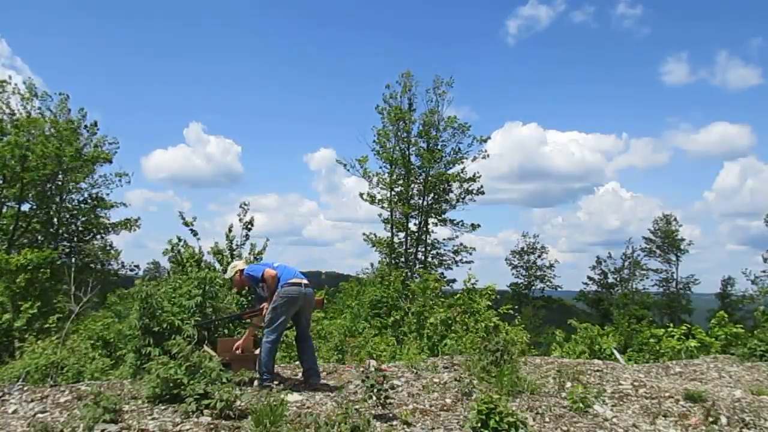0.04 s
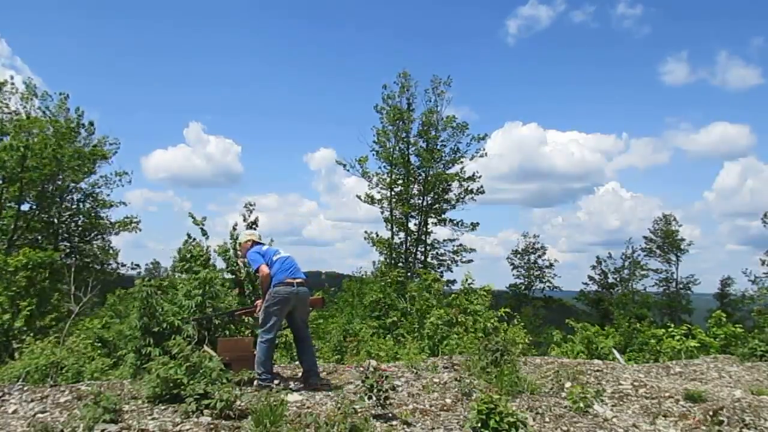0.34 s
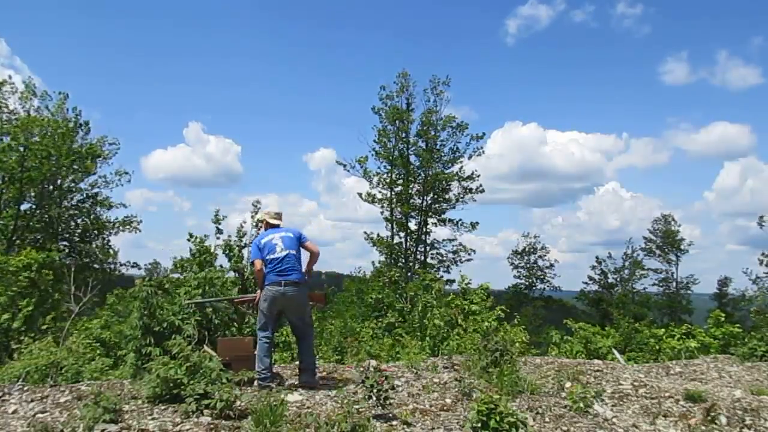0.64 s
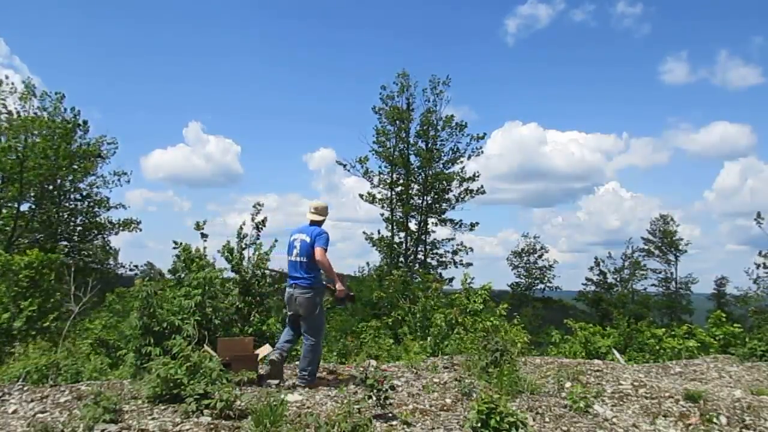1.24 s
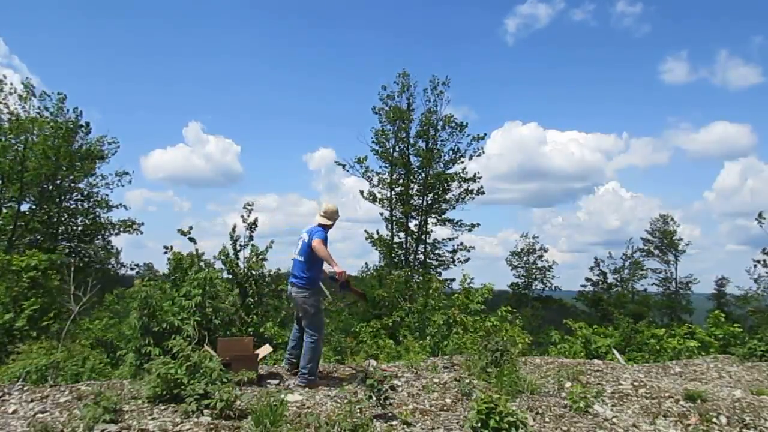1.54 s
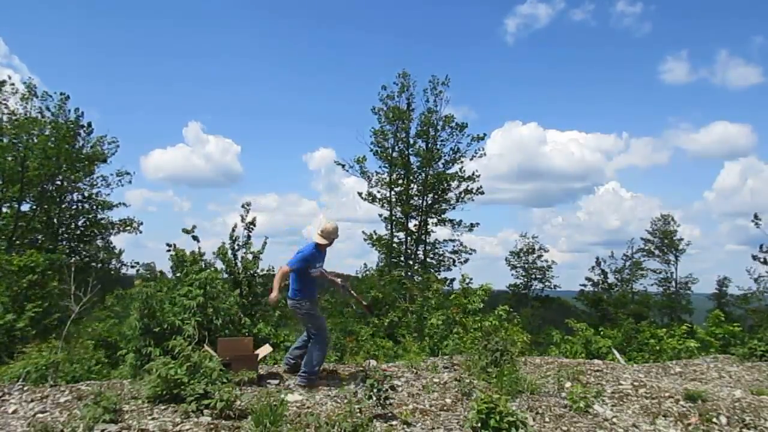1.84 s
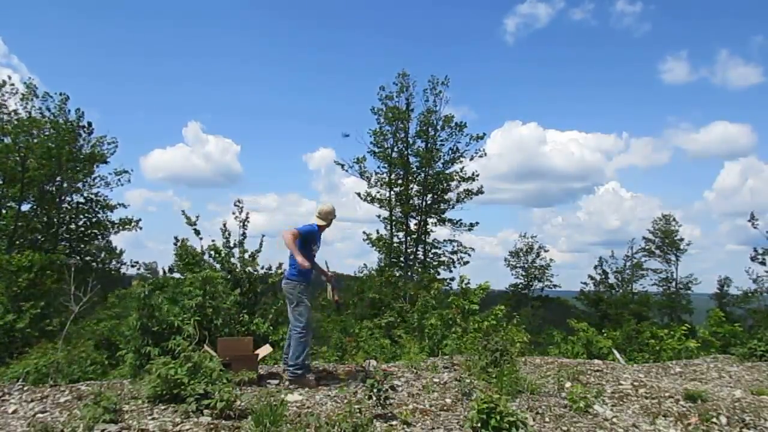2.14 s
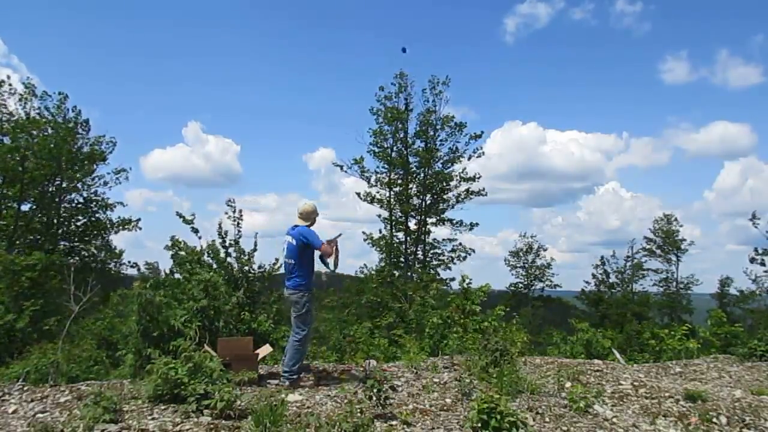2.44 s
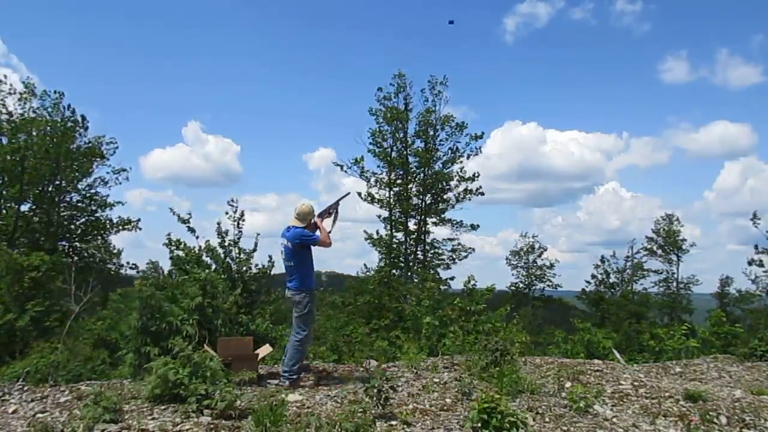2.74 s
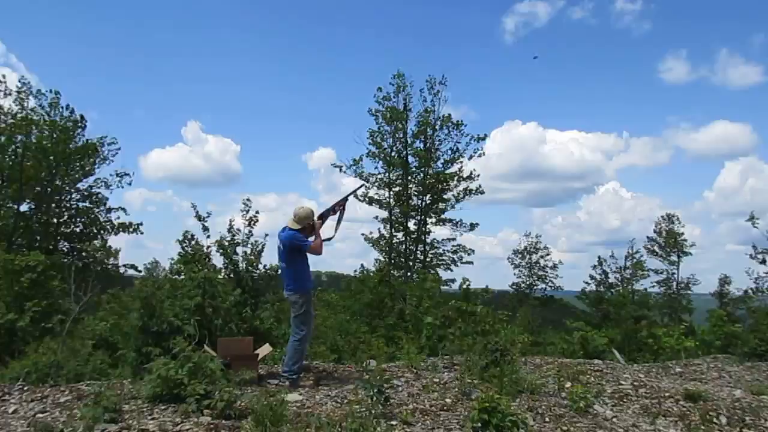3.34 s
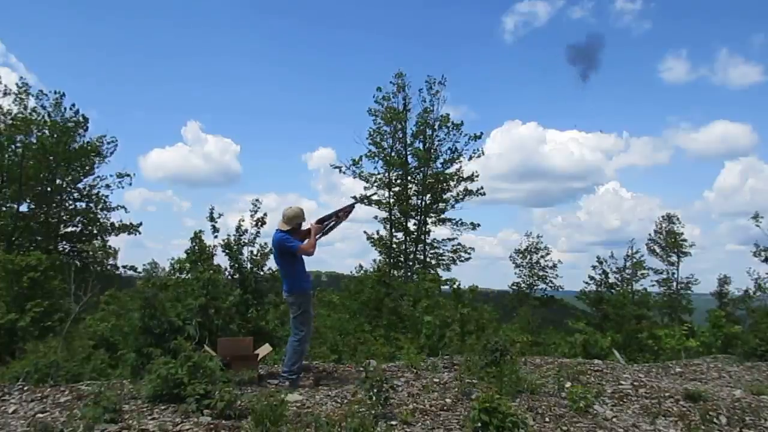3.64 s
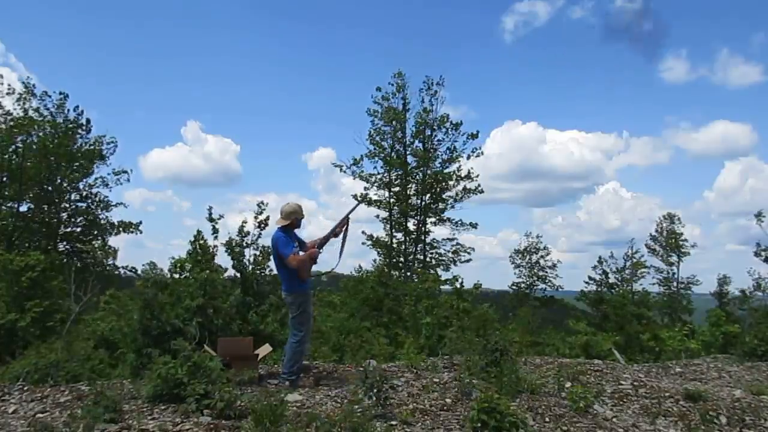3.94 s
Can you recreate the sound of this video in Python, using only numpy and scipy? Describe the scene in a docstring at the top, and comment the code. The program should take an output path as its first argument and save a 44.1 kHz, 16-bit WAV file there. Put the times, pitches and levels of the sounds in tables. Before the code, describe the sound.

A single shotgun blast is the main sound, on an open hilltop. From the start, leaves hiss softly and wind rumbles unevenly on the microphone. A few faint dry ticks fall between 1.2 and 2.5 seconds, and a steel clay thrower clinks lightly at 2 seconds. At about 3.5 seconds the gun fires with a loud, slightly distorted crack, followed by quick echoes and a fading tail from the woods.

```python
"""Leaves hiss on an open hilltop, and eddies of wind rumble on the microphone.
A steel trap clinks in its natural modes as it throws a clay target; then a shotgun fires some metres off.
The shock wave and its ground reflection overload the recorder, whose gain ducks and slowly recovers.
Bushes scatter the blast, trunks and banks return echoes, and the woods reverberate, duller with distance."""
import sys
import numpy as np
from scipy import signal
from scipy.fft import rfft, irfft, next_fast_len
from scipy.io import wavfile
from scipy.ndimage import uniform_filter1d, map_coordinates

SR = 44100
rng = np.random.default_rng(int(sys.argv[2]) if len(sys.argv) > 2 else 0)


def master_out(mix):
    """Clip the mix to full scale and print it as 16-bit PCM to the path in sys.argv[1]."""
    frames = np.transpose(np.atleast_2d(mix))
    ceiling = np.clip(frames, -1, 1)
    pcm = np.round(ceiling * 32767).astype(np.int16)
    wavfile.write(sys.argv[1], SR, pcm)


N = 176400

# Muzzle blast, then its ground reflection. Each row: start in seconds, crack gain in dB,
# 60 dB decay time in seconds, pressure pulse gain in dB.
SHOCKS = [(3.5434, 7, .022, -8), (3.5475, 10.5, 0.036, -2)]
# Echoes from trunks and banks. Each row: start in seconds, peak in dB, centre frequency in Hz.
REFLECTIONS = [(3.5880, 10.5, 2140), (3.5919, 4.5, 1800), (3.594, -14.5, 240), (3.602, -13.5, 260),
               (3.612, -18.5, 188), (3.690, -5, 500), (3.699, -15.5, 480), (3.7127, -15.5, 420),
               (3.7427, -11, 1050), (3.795, -24, 500), (3.839, -16, 650), (3.8471, -15, 920),
               (3.855, -19, 550), (3.8617, -14, 550), (3.876, -24, 480), (3.8925, -21.5, 500),
               (3.962, -25.5, 650), (3.984, -29, 500)]
# Swells from tree lines. Each row: time in seconds, boost in dB, half width in seconds.
TREE_LINE_SWELLS = [(3.664, 3, 0.0044), (3.691, 8.5, 0.0097), (3.744, 6, 0.0059), (3.785, 2.5, 0.0064),
                    (3.852, 9.5, 0.026), (3.861, 6, .006), (3.915, 4.5, 0.02), (3.960, 8, 0.014)]
# Modes of the trap. Each row: frequency in Hz, relative level in dB, 60 dB decay time in seconds.
STEEL_MODES = [(2520, -3, 0.12), (4580, -1.5, 0.076), (4660, -5, .08), (7770, -8, .06), (9650, -0.5, .03),
               (10070, -1, 0.048), (10860, -7, .03), (12250, -10, .04), (14400, -9, .035)]
# Contacts in the trap. Each row: start in seconds, gain in dB.
TRAP_CONTACTS = [(1.9714, -60), (2.015, -43), (2.018, -36.5)]
# Dry ticks. Each row: start in seconds, level in dB, nominal band frequency in Hz.
DRY_TICKS = [(1.2224, -37, 1550), (1.2994, -51, 12000), (1.4294, -50, 10000), (1.5714, -51, 9500),
             (2.2244, -46, 5500), (2.4564, -51, 8000)]
# Wind rumble. Each row: time in seconds, level in dB before BUFFET_DB is added.
BUFFET_ENVELOPE = [(0.0, -47.5), (0.15, -32), (0.2, -41), (0.33, -33.5), (0.52, -57), (0.57, -40.5),
                   (0.6, -45), (0.64, -36.5), (0.75, -31.5), (0.89, -52), (0.93, -38.5), (1.02, -33),
                   (1.06, -57), (1.22, -33), (1.34, -62), (1.88, -56), (1.92, -35.5), (1.98, -43),
                   (2.04, -26), (2.07, -35), (2.18, -47.5), (2.27, -30), (2.32, -52), (2.5, -34.5),
                   (2.59, -43), (2.86, -38), (2.92, -27), (2.95, -37), (2.98, -29), (3.02, -32),
                   (3.06, -25.5), (3.09, -35.5), (3.26, -30.5), (3.28, -45), (3.33, -30.5), (3.37, -45),
                   (3.43, -36), (3.5, -43)]
# Puffs on the microphone. Each row: time in seconds, peak in dB, half width in seconds.
WIND_PUFFS = [(.115, -23.5, .0022), (0.1463, -24, 0.0027), (.157, -26.5, 0.0018), (0.318, -24, 0.0017),
              (0.567, -33, 0.0024), (0.731, -26, .0014), (.758, -30.5, 0.0015), (.927, -24.5, 0.0024),
              (.950, -26, .0016), (2.0343, -17.5, .0026), (2.924, -20, .003), (2.980, -20, 0.0027),
              (3.060, -22.5, .0022), (3.107, -28, 0.0013), (3.179, -27.5, 0.0015), (3.239, -24, 0.0021)]
# Steady far roar and leaf hiss, growing louder as the recorder's gain recovers.
# Each row: time in seconds, roar and hiss in dB before ROAR_DB and HISS_DB are added.
BACKGROUND_LEVEL = [(0.0, -54, -56.5), (0.14, -53.5, -56), (0.41, -52.5, -54.5), (1.45, -47, -49.5),
                    (1.79, -46, -49), (2.81, -46.5, -49.5), (3.5, -45.5, -48.5)]
# Spectra. Each row: frequency in Hz, relative spectral density in dB.
CRACK_SPECTRUM = [(40, -20), (110, -17), (170, -22), (290, 1.5), (480, 2), (600, -5), (730, 2.5),
                  (900, -2.5), (1300, -3.5), (1700, -5), (2300, 2.5), (2900, -2.5), (3400, -0.5),
                  (4100, -4.5), (4900, -9), (5600, -11), (7000, -8.5), (9000, -13), (10500, -20.5),
                  (15000, -18)]  # muzzle blast
BUSH_SPECTRUM = [(50, -23), (250, -3.5), (1000, -3.5), (3000, -0.5), (5500, -4), (9000, -8.5), (15000, -16)]  # scatter from ground and bushes
WOODS_SPECTRUM = [(50, -22), (150, -3), (400, -2.5), (800, -2.5), (1500, 1.5), (3300, 4.5), (6000, -1.5),
                  (10000, -5.5), (15000, -9)]  # diffuse reverberation
TRUNK_SPECTRUM = [(100, -12), (500, -1), (1500, -2), (4000, -7.5), (12000, -31)]  # sparse reflections
EDDY_SPECTRUM = [(15, -14), (38, 4), (95, -3), (180, -17), (300, -28.5), (600, -47.5), (2000, -82)]  # wind on the microphone
ROAR_SPECTRUM = [(25, -5.5), (60, -1.5), (150, -0.5), (300, 0), (600, -0.5), (900, -3.5), (1500, -12.5),
                 (3000, -27.5), (15000, -58)]  # wind in far trees
HISS_SPECTRUM = [(100, -16), (800, -9.5), (1500, 0.5), (2200, 0.5), (3200, 0), (4200, -3), (5500, -8),
                 (8000, -12.5), (11000, -18), (15000, -26)]  # near leaves

CRACK_RISE_S, PUSH_S = 0.0006, 0.0012
BUSH_DB, BUSH_HOLD_S, BUSH_T60_S = -8, 0.033, 0.14
THUMP_DB, THUMP_S, RUMBLE_DB, RUMBLE_T60_S = -15, 0.003, -33, 1.1
WOODS_DB, WOODS_T60_S, AIR_DB_PER_S = -17, 1, 56.5  # air absorption at 10 kHz
TRUNKS_PER_S, TRUNK_DB = 320, -6.5
BUFFET_DB, ROAR_DB, HISS_DB = -3.5, 1, 1
WHINE_HZ, WHINE_DB = 1896, -64
DUCK_ABOVE_DB, DUCK_MAX_DB, DUCK_ATTACK_S, RECOVER_DB_PER_S = -11.5, 13, 0.0034, 8
CUTOFF_HZ = 15050


def blast():
    """Reflection and scattering: the shock arrives directly, then off the ground, then off bushes."""
    direct_s, bounce_s = SHOCKS[0][0], SHOCKS[1][0]
    crack = sum(amp(db) * decay(s, t60) * rng.standard_normal(N) for s, db, t60, _ in SHOCKS)
    crack = whitened(crack) * np.clip((clock() - direct_s) / CRACK_RISE_S, 0, 1) ** 2
    push = banded(sum(amp(db) * shock(s, PUSH_S) for s, _, _, db in SHOCKS), 220, 3000)
    scatter = rng.standard_normal(N) * decay(bounce_s, BUSH_T60_S, BUSH_HOLD_S)
    scatter *= amp(BUSH_DB + 1.8 * wobble(300))
    return coloured(crack, CRACK_SPECTRUM) + push + coloured(scatter, BUSH_SPECTRUM)


def shock(start, length):
    """Blast wave: a jump to overpressure lasting `length` seconds, followed by suction."""
    u = np.maximum(clock() - start, 0) / length
    return (clock() >= start) * (1 - u) * np.exp(-u)


def boom():
    """Low-frequency decay: the shock's deep part thumps, and a faint rumble dies away over the hill."""
    start = SHOCKS[1][0]
    thump = amp(THUMP_DB) * banded(shock(start, THUMP_S), 35, 140)
    rumble = unit(banded(rng.standard_normal(N), 40, 150))
    return thump + amp(RUMBLE_DB) * decay(start, RUMBLE_T60_S) * rumble


def echoes():
    """Discrete reflection: trunks and banks return delayed, band-limited copies of the shock."""
    out = np.zeros(N)
    for s, db, hz in REFLECTIONS:
        pulse = banded(shock(s, 0.27 / hz), hz * 0.61, hz * 1.63)
        out += amp(db) * pulse / np.abs(pulse).max()
    return out


def woods():
    """Reverberation from leaves and trunks; air absorption grows with path and frequency squared."""
    start = SHOCKS[0][0]
    swell_db = sum(db * np.exp(-((clock() - s) / width) ** 2 / 2) for s, db, width in TREE_LINE_SWELLS)
    envelope = decay(start, WOODS_T60_S) * amp(WOODS_DB + swell_db)
    foliage = unit(rng.standard_normal(N) * amp(1.6 * wobble(700) + 1.8 * wobble(70)))
    trunks = unit((rng.random(N) < TRUNKS_PER_S / SR) * rng.standard_normal(N))
    tail = coloured(foliage * envelope, WOODS_SPECTRUM)
    tail += amp(TRUNK_DB) * coloured(trunks * envelope, TRUNK_SPECTRUM)
    hz, t, spectra = signal.stft(tail, SR, nperseg=256)
    loss_db = AIR_DB_PER_S * np.maximum(t - start, 0) * (hz[:, None] / 10000) ** 2
    return signal.istft(spectra * amp(-loss_db), SR)[1][:N]


def trap():
    """Free vibration: each contact clicks and excites the damped modes of the steel throwing arm."""
    out, t = np.zeros(N), np.arange(SR // 4) / SR
    for s, db in TRAP_CONTACTS:
        ring = np.zeros(len(t))
        for hz, mode_db, t60 in STEEL_MODES:
            envelope = amp(mode_db + rng.normal(0, 1) - 60 * t / t60)
            ring += envelope * np.sin(2 * np.pi * (hz * t + rng.random()))
        click = amp(-6 - 60 * t / 0.015) * rng.standard_normal(len(t))
        out[round(s * SR):][:len(t)] += amp(db) * (ring + click)
    return out


def ticks():
    """Transients: rapidly damped bands of noise are heard as tiny dry clicks."""
    return sum(amp(db) * decay(s, t60=0.015) * unit(banded(rng.standard_normal(N), hz * 0.46, hz * 1.3))
               for s, db, hz in DRY_TICKS)


def buffets():
    """Turbulent pressure: eddies rumble on the microphone, the hardest arriving as single puffs."""
    eddies = noise(EDDY_SPECTRUM)
    local_rms = np.sqrt(np.abs(uniform_filter1d(eddies ** 2, size=2600)) + 1e-6)
    level_db = np.interp(clock(), *np.transpose(BUFFET_ENVELOPE)) + BUFFET_DB
    out = eddies / local_rms * amp(level_db)
    for s, db, width in WIND_PUFFS:
        u = (clock() - s) / width
        out += amp(db) * (u * u - 1) * np.exp(-u * u / 2)
    return out


def leaves():
    """Flow noise: wind roars softly in far trees and hisses in near leaves, around a faint whine."""
    t = clock()
    s, roar_db, hiss_db = np.transpose(BACKGROUND_LEVEL)
    roar = noise(ROAR_SPECTRUM) * amp(np.interp(t, s, roar_db) + ROAR_DB + 0.4 * wobble(5.92))
    hiss = noise(HISS_SPECTRUM) * amp(np.interp(t, s, hiss_db) + HISS_DB + 0.15 * wobble(7.47))
    whine = amp(WHINE_DB + 1.55 * wobble(5.7)) * np.sin(2 * np.pi * WHINE_HZ * t + 0.44 * wobble(13))
    return roar + hiss + whine


def amp(db):
    """Amplitude ratio from decibels."""
    return 10 ** (np.asarray(db) / 20)


def unit(x):
    """Normalisation to rms 1."""
    return x / np.sqrt(np.mean(x ** 2) + 1e-20)


def clock():
    """Sample times in seconds."""
    return np.arange(N) / SR


def wobble(rate):
    """Smooth random modulation with `rate` knots a second."""
    return map_coordinates(rng.standard_normal(int(N * rate / SR) + 4), [clock() * rate])


def decay(start, t60, hold=0):
    """Exponential decay: silence, full level for the hold, then a fall of 60 dB every t60 seconds."""
    t = clock() - start
    return (t >= 0) * amp(-60 * np.maximum(t - hold, 0) / t60)


def coloured(x, points):
    """Minimum-phase filtering at unit power gain through (Hz, dB) points."""
    size = 2 * next_fast_len(N // 2 + SR // 4)
    hz, db = np.transpose(points)
    log_hz = np.log(np.fft.rfftfreq(size, 1 / SR) + 1)
    gain = unit(amp(np.interp(log_hz, np.log(hz), db)))
    cepstrum = irfft(np.log(gain), size)
    cepstrum[1:size // 2] *= 2  # folding onto positive time makes the filter causal
    cepstrum[size // 2 + 1:] = 0
    return irfft(rfft(x, size) * np.exp(rfft(cepstrum)), size)[:N]


def noise(points):
    """Coloured noise of rms 1."""
    return unit(coloured(rng.standard_normal(N), points))


def banded(x, low_hz, high_hz):
    """Causal band-pass filtering."""
    edges = [low_hz, min(high_hz, SR / 2 - 10)]
    return signal.sosfilt(signal.butter(2, edges, 'band', fs=SR, output='sos'), x)


def whitened(x):
    """Spectral whitening: a burst's energy is spread evenly over frequency."""
    spectrum = rfft(x)
    power = np.abs(uniform_filter1d(np.abs(spectrum) ** 2, size=600))
    return irfft(spectrum * np.sqrt(power.mean() / power), N)


def scene():
    """Superposition: all pressures add at one microphone."""
    return (leaves() + buffets() + trap() + ticks() + blast() + woods() + echoes() + boom())[None]


def record(dry):
    """Compression and saturation: gain ducks on the blast, peaks flatten, and the top treble is cut."""
    x = dry[0]
    excess_db = np.clip(20 * np.log10(np.abs(x) + 1e-9) - DUCK_ABOVE_DB, 0, DUCK_MAX_DB)
    recovery_db = RECOVER_DB_PER_S * clock()
    cut_db = np.maximum.accumulate(excess_db + recovery_db) - recovery_db  # peak hold, slow release
    pole = np.exp(-1 / (DUCK_ATTACK_S * SR))
    ducked = x * amp(-signal.lfilter([1 - pole], [1, -pole], cut_db))
    saturated = ducked / (1 + ducked ** 6) ** (1 / 6)
    low_pass = signal.cheby1(16, 0.05, CUTOFF_HZ, fs=SR, output='sos')
    return signal.sosfiltfilt(low_pass, saturated)[None]


dry = scene()
out = record(dry)
master_out(out)
```